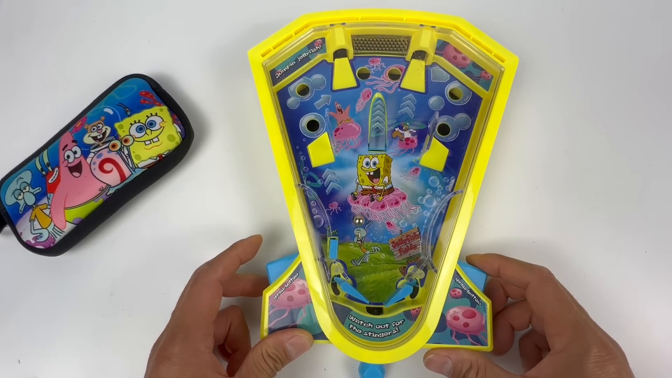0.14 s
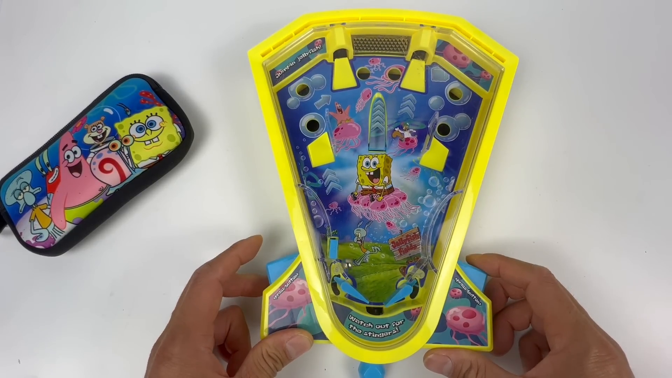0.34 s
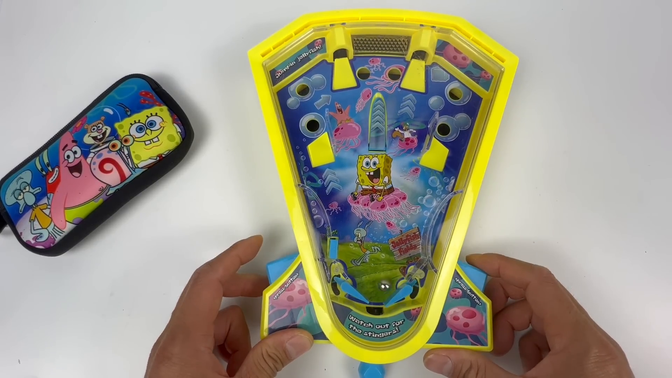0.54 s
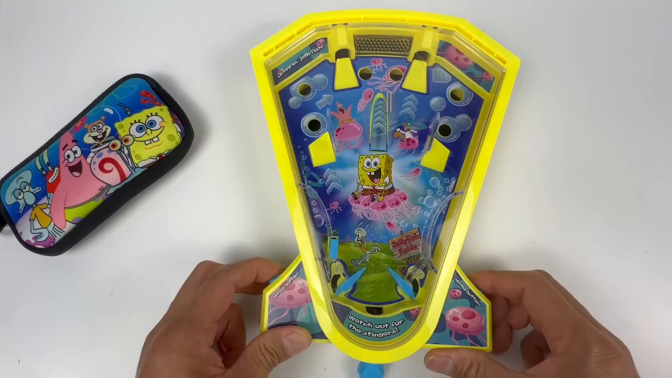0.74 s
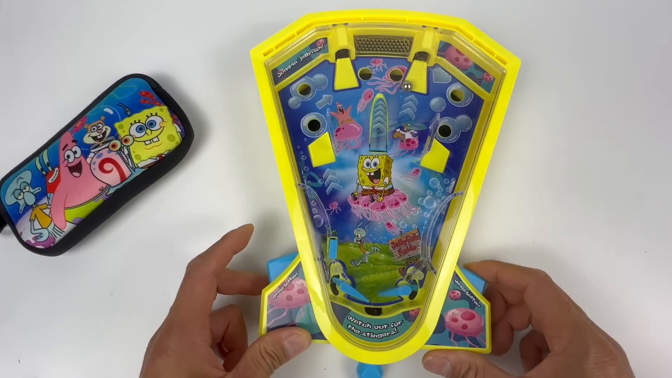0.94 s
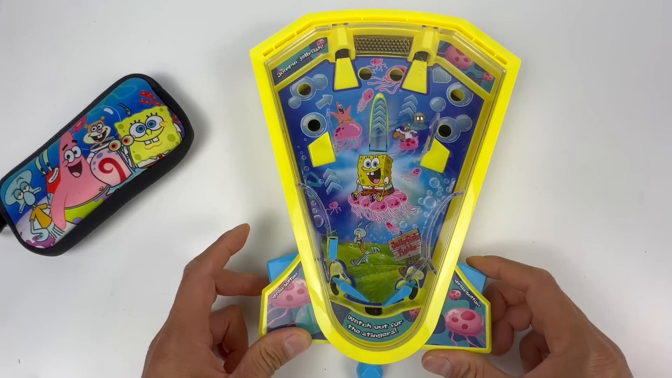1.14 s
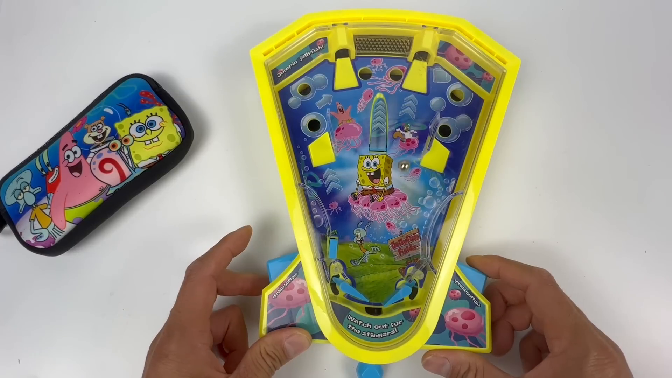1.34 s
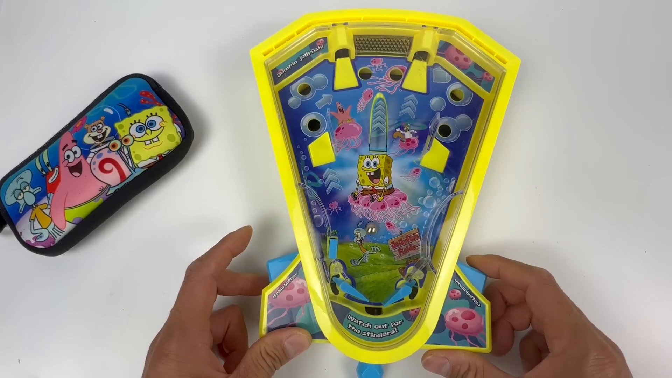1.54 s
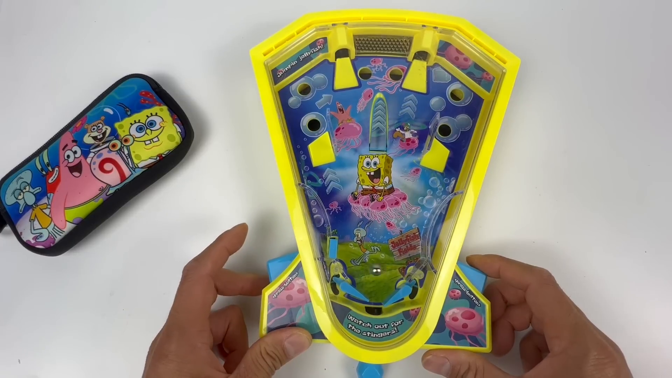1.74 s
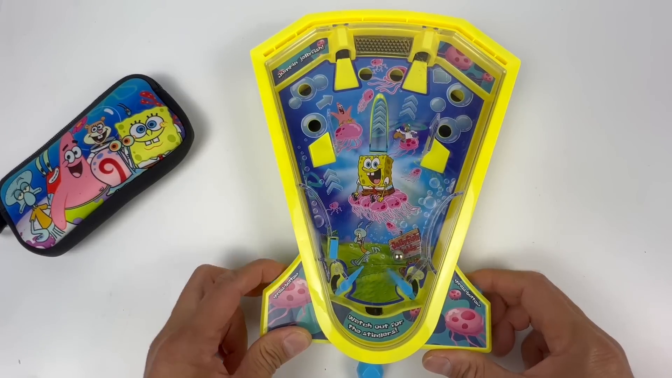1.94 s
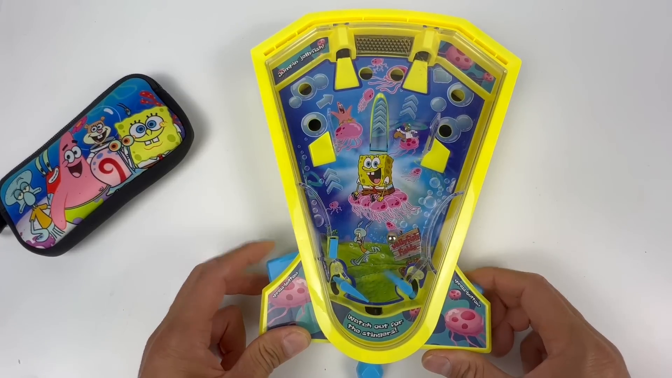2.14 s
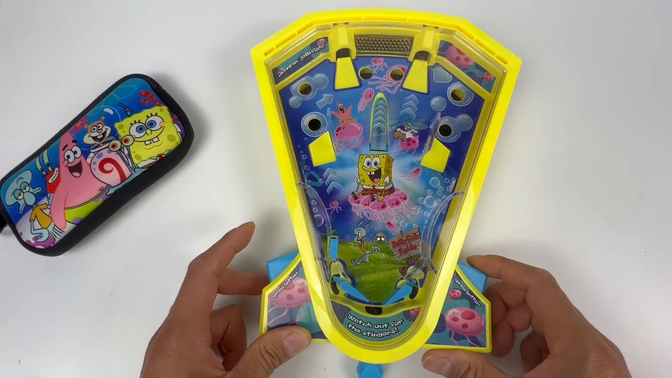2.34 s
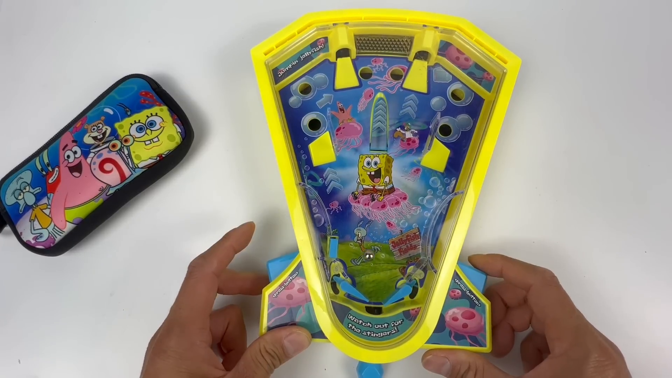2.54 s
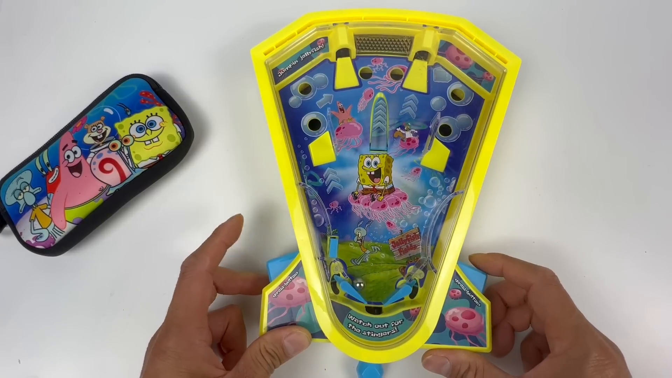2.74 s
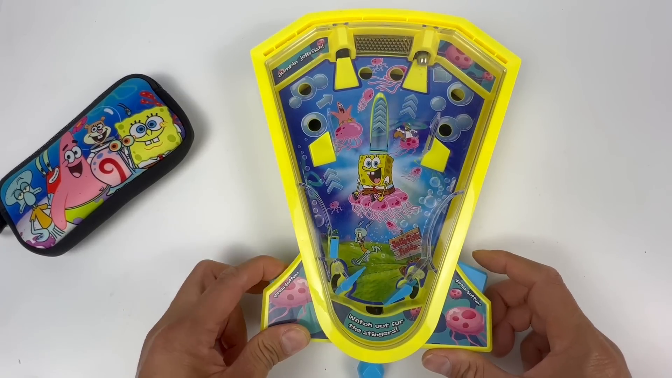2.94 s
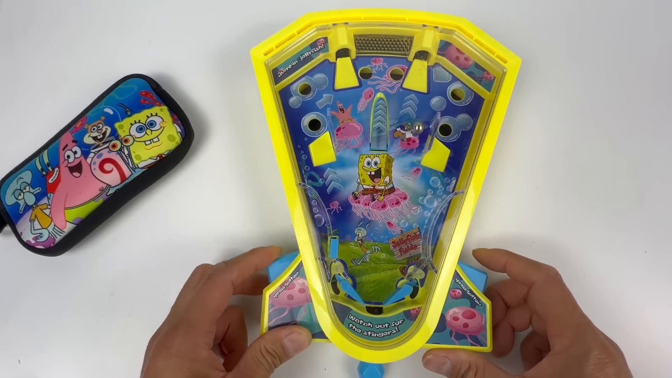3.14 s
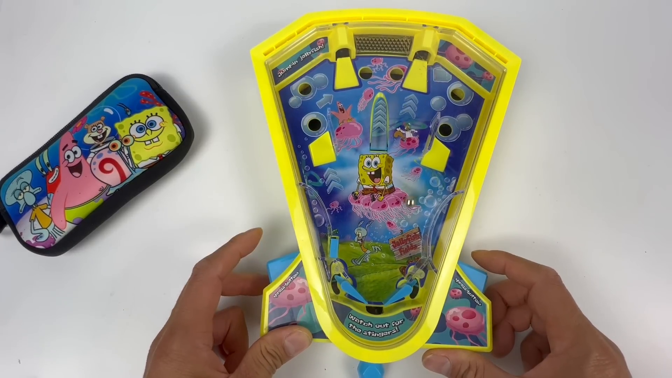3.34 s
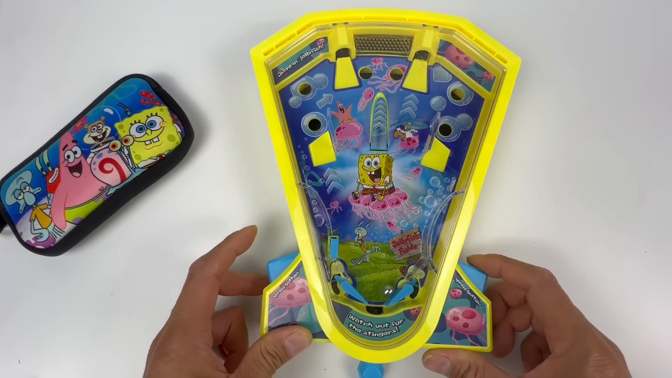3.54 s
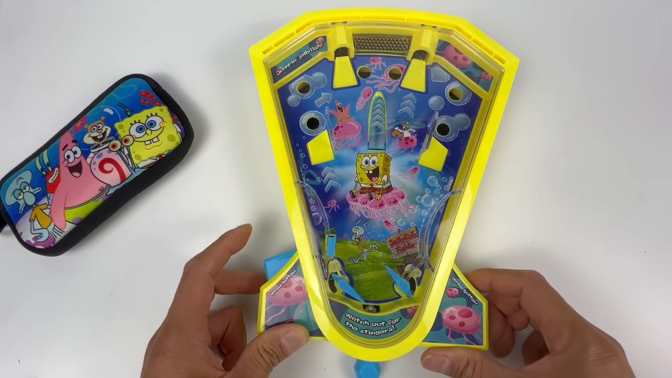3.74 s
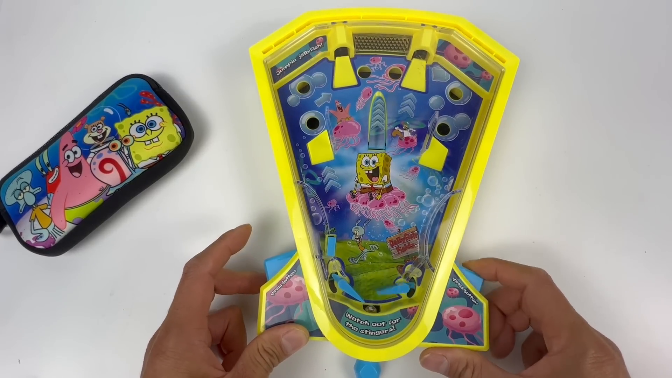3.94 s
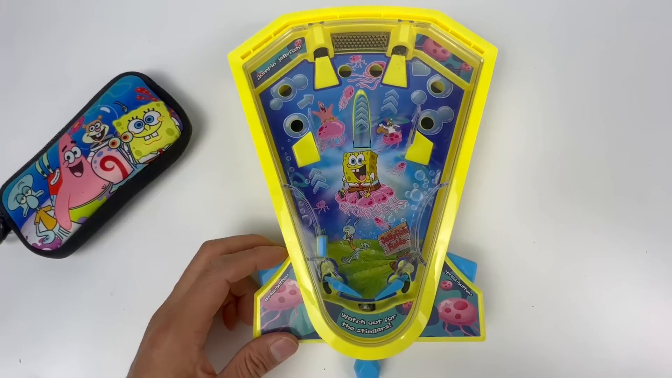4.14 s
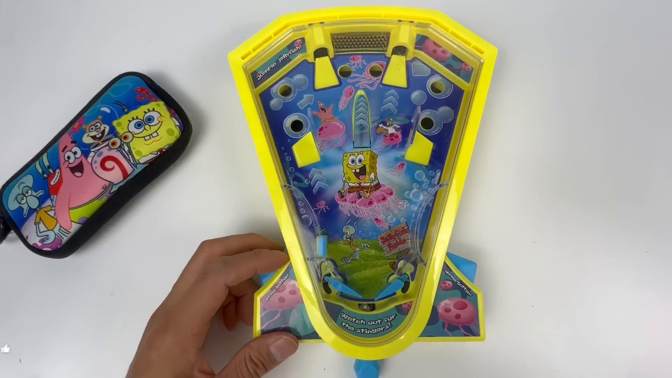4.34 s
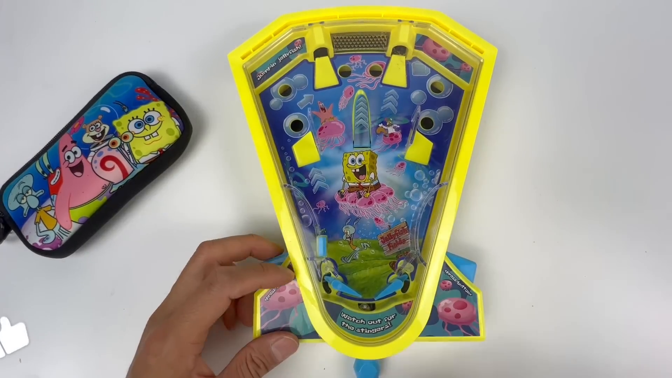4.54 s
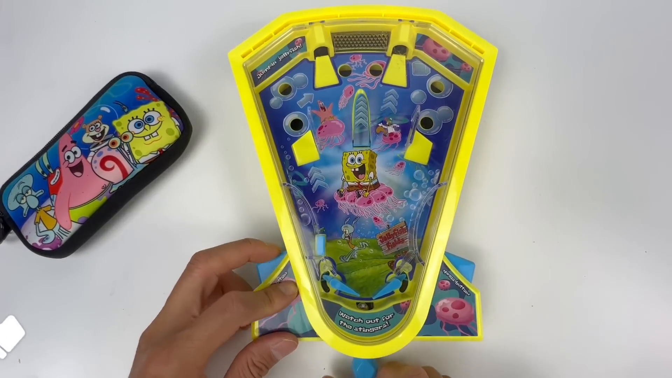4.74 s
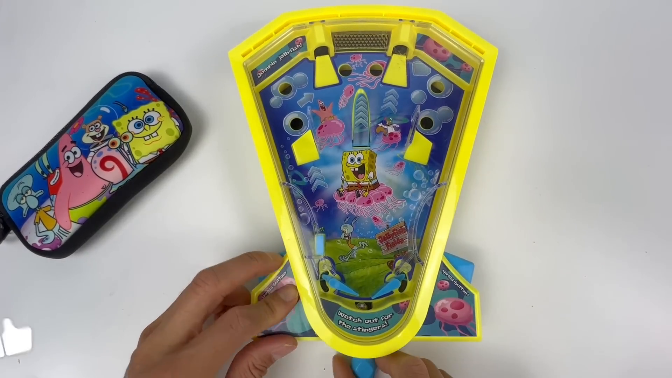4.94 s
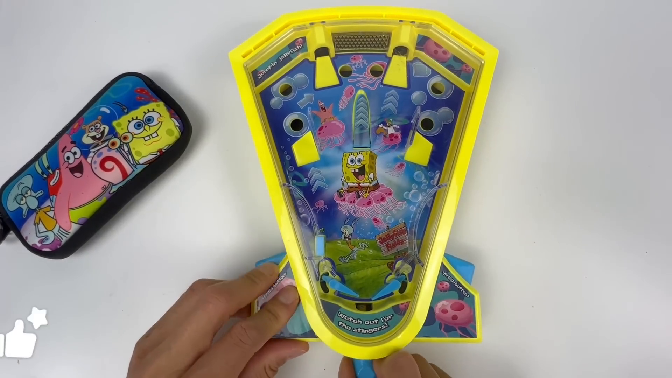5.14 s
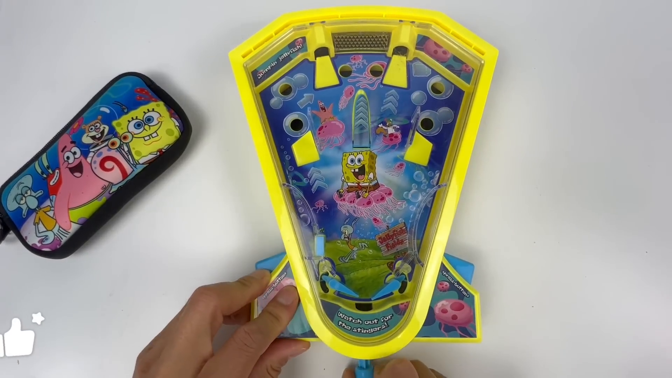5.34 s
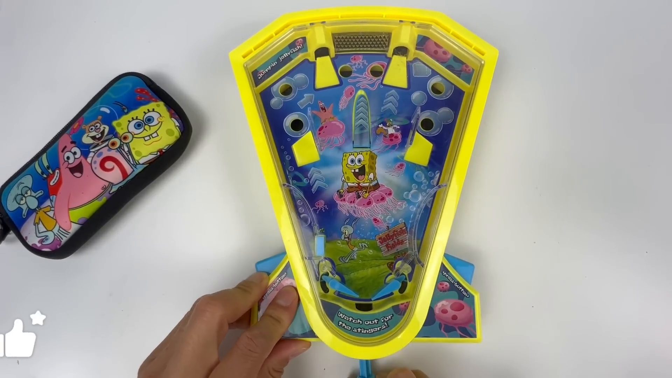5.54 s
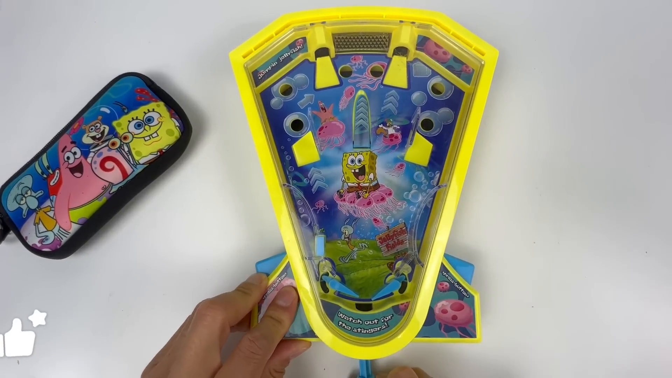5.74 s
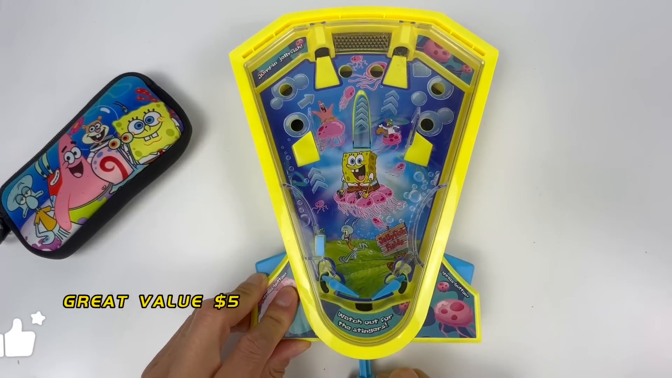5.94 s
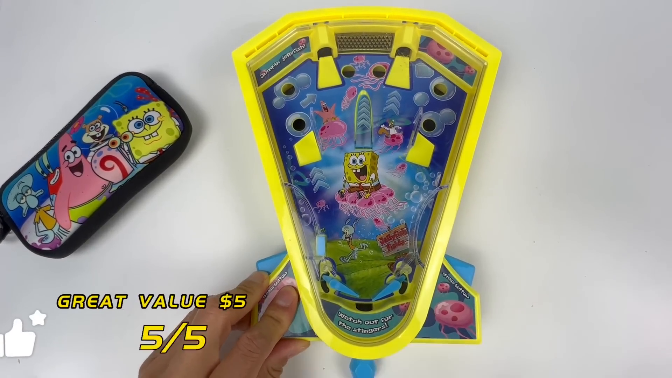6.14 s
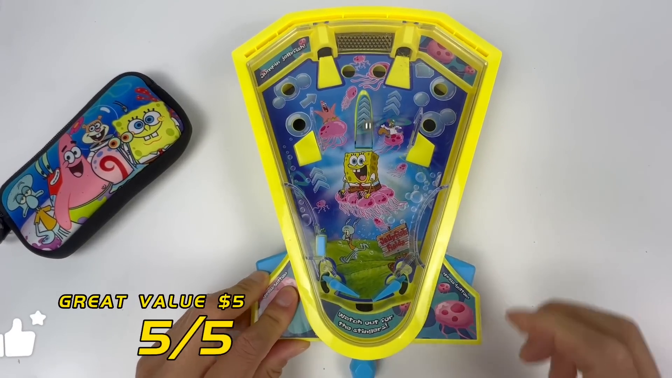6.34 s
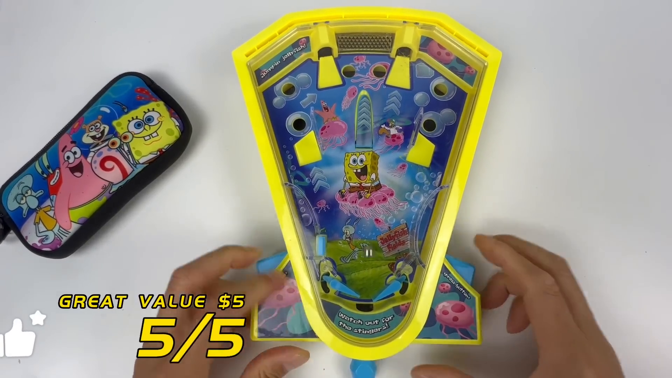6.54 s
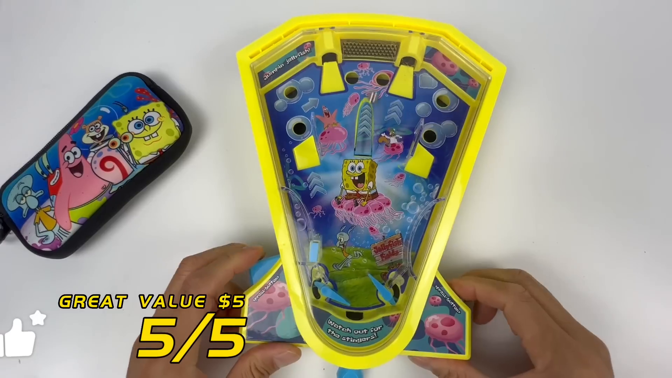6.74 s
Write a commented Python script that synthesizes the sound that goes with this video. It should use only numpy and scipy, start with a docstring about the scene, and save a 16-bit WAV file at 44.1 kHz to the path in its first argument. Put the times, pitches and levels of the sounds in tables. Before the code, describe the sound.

Plastic pinball toy played by hand: sharp lever clacks, soft ball rumble, dull bounces, then a quiet handling rustle and another rattling launch.

```python
"""First a small ball rumbles over a board in faint air noise; then a plastic pinball toy clacks in a bare room.
Flippers, plunger and a steel ball strike the hollow case: noise cracks plus dying sines for its modes.
Bounces ring the thin playfield; rolling, rubbing and finger grips are streams of tiny random contacts.
Loose parts chatter, the feet judder on the desk, and the room adds reflections.
Two stretches of play are joined by a hard splice, where the room's ring stops short."""
import sys
import numpy as np
from scipy import signal
from scipy.fft import rfft, irfft, next_fast_len
from scipy.io import wavfile

SR = 44100
rng = np.random.default_rng(int(sys.argv[2]) if len(sys.argv) > 2 else 0)


def wav_record(signal):
    """Record a signal, one row per channel, as 16-bit PCM in the file named by sys.argv[1]."""
    frames = np.transpose(np.atleast_2d(signal))
    bounded = np.clip(frames, -1, 1)
    # unit amplitude maps onto the largest positive 16-bit level
    quanta = np.round(bounded * 32767).astype(np.int16)
    wavfile.write(sys.argv[1], SR, quanta)


N = 299439
T = np.arange(N) / SR
HIT_T = T[:SR // 5]  # time axis of one blow, 0.2 s
LEFT_RIGHT = np.array([[1], [-1]])  # opposite signs for the two channels


def from_db(db):
    """Turn decibels into a gain."""
    return 10 ** (np.asarray(db) / 20)


def rms_one(x):
    """Scale a sound to rms 1."""
    return x / np.sqrt(np.mean(x ** 2) + 1e-20)


def attack_one(x, size=SR // 125):
    """Scale a blow to rms 1 over its first samples, 8 ms unless told otherwise."""
    return x / np.sqrt(np.mean(x[..., :size] ** 2) + 1e-20)


def at_hz(points, hz):
    """Read a table between its points, on a log-frequency axis."""
    f, value = np.transpose(points)
    return np.interp(np.log(hz), np.log(f), value)


def fft_hz(n):
    """Frequencies of a real FFT of n samples, with 1 Hz in place of zero."""
    return np.maximum(np.arange(n // 2 + 1) * SR / n, 1)


def add(out, s, sound):
    """Mix a sound in at time s."""
    i = int(s * SR)
    out[:, i:i + sound.shape[-1]] += sound[..., :N - i]


def gain_curve(rows, attack_s, release_s, slope_db_per_s):
    """Gain of strokes that swell, hold on a slope and fade; attack and release each span 20 dB."""
    out = np.zeros(N)
    for start, length, db in rows:
        held = np.clip(T, start, start + length)
        outside = np.maximum(held - T, 0) / attack_s + np.maximum(T - held, 0) / release_s
        slope_db = slope_db_per_s * (held - start - length / 2)
        stroke = from_db(db + slope_db - 20 * np.minimum(outside, 10))
        out = np.maximum(out, stroke)
    return out


def colour(x, spectrum):
    """Filter a sound by a table of levels over frequency, then scale it to rms 1."""
    n = next_fast_len(x.shape[-1])
    gain = from_db(at_hz(spectrum, fft_hz(n)))
    return rms_one(irfft(rfft(x, n) * gain, n)[..., :x.shape[-1]])


def band(x, low_hz, high_hz):
    """Keep one frequency band with a causal filter."""
    edges = [low_hz, min(high_hz, SR / 2 - 100)]
    return signal.sosfilt(signal.butter(2, edges, "band", fs=SR, output="sos"), x)


def waver(per_s, depth_db):
    """A gain that wanders at random between knots."""
    knots = rng.standard_normal(1000)
    return from_db(depth_db * np.interp(T * per_s, np.arange(len(knots)), knots))


def grains(per_s, spread_db):
    """Tiny contacts at random moments, of random sign and size."""
    sizes = from_db(spread_db * np.minimum(rng.exponential(1, N), 4)) * rng.choice([-1, 1], N)
    return sizes * (rng.random(N) < per_s / SR)


def note(hz, t60):
    """One dying sine, rms 1 in its attack."""
    return attack_one(from_db(-60 * HIT_T / t60) * np.sin(2 * np.pi * hz * HIT_T))


MODE_DETUNING = .02  # random spread of mode pitch from blow to blow, as a share of pitch


def ring(modes, t60_at_1k, scatter_db):
    """Struck modes, each with a random strength and sign from blow to blow; high ones die sooner."""
    hz, db = np.transpose(modes)[:, :, None]
    hz = hz * (1 + MODE_DETUNING * rng.standard_normal(hz.shape))
    t60 = t60_at_1k * (1000 / hz) ** (1 / 3)
    strength = from_db(db + scatter_db * rng.standard_normal(hz.shape))
    strength = strength * rng.choice([-1, 1], hz.shape)
    return np.sum(strength * from_db(-60 * HIT_T / t60) * np.sin(2 * np.pi * hz * HIT_T), axis=0)


def scraping(slips, spectrum, width=0.6, count=6):
    """Each slip is a tiny 22 ms noise blow on one of several spots of the case; rms 1."""
    out = 0
    spots = rng.integers(0, count, N)
    for k in range(count):
        mid, side = rng.standard_normal((2, len(HIT_T))) * from_db(-60 * HIT_T / .022)
        blow = mid + width * band(side, 600, 8000) * LEFT_RIGHT
        here = (slips * (spots == k))[None]
        out = out + signal.oaconvolve(here, blow, axes=1)[:, :N]
    return colour(out, spectrum)


# How alike spread-out sound is at left and right: f/Hz, likeness (1 = the same)
LIKENESS = [(60, .99), (290, .88), (640, .55), (1400, .38), (3100, .22), (7000, .3), (14000, .8)]


def diffuse(n):
    """White stereo noise whose two sides are more or less alike at each frequency."""
    mid, side = rfft(rng.standard_normal((2, n)))
    alike = np.clip(at_hz(LIKENESS, fft_hz(n)), -1, 1)
    return irfft(np.sqrt(1 + alike) * mid + np.sqrt(1 - alike) * side * LEFT_RIGHT, n)


# Tone of the faint air noise, before scaling to rms 1: f/Hz, relative level/dB
AIR_SPECTRUM = [(12, -37.5), (22, -23), (38, -12), (58, -4.5), (91, -19.5), (130, -9.5), (377, -43.5),
                (4300, -57), (12100, -64.5), (16000, -74)]


def air(level_db=-57.5):
    """Steady, mostly low noise in the air: random noise given a fixed tone."""
    return from_db(level_db) * colour(diffuse(next_fast_len(N))[:, :N], AIR_SPECTRUM)


# Late sound of the room: f/Hz, level/dB
ROOM_LEVEL = [(60, -21.5), (200, -17.5), (400, -19), (1000, -19.5), (2500, -23.5), (4500, -18),
              (6200, -18.5), (10000, -22.5), (11700, -19), (12800, -32.5), (15000, -36)]
# How long the late sound takes to fall by 60 dB: f/Hz, t60/s
ROOM_T60 = [(60, 3.9), (400, 0.29), (1200, 0.68), (3000, 0.99), (7000, 0.74), (15000, 0.32)]


def room(x, early_db=-17, early_t60=0.073, build_s=0.014):
    """Quick reflections from desk and walls, then a long faint tail that dies band by band."""
    t, response = T[:SR * 3 // 2], 0
    edges = np.geomspace(40, 18000, 13)
    noises = diffuse(len(t)), diffuse(len(t))
    onset = 1 - np.exp(-(t / build_s) ** 2)
    early = from_db(early_db) * rms_one(onset * from_db(-60 * t / early_t60))
    for k, (low, high) in enumerate(zip(edges, edges[1:])):
        hz = np.sqrt(low * high)
        tail = rms_one(onset * from_db(-60 * t / at_hz(ROOM_T60, hz)))
        late = from_db(at_hz(ROOM_LEVEL, hz)) * tail
        # neighbouring bands take turns between two noises
        response = response + band(noises[k % 2], low, high) * np.hypot(late, early) / np.sqrt(len(t))
    return signal.fftconvolve(x, response, axes=1)[:, :N]


# The toy's feet judder on the desk: start t/s, length t/s, level/dB
SHIFTS = [(1.925, 0.037, -39.5), (2.79, 0.011, -30.5), (5.42, 0.2, -50), (6.12, 0.065, -37.5),
          (6.58, 0.16, -43)]


def shifting():
    """Pushed or jolted, the toy judders on the desk: a low rumble of many tiny contacts."""
    judder = rms_one(band(grains(per_s=1600, spread_db=2.0), 95, 175.7))
    return gain_curve(SHIFTS, attack_s=0.014, release_s=.09, slope_db_per_s=0) * judder


# Fingers slide over the case and shift it: start t/s, length t/s, level halfway/dB before level_db
GRIPS = [(4.46, 0.15, -66.5), (4.725, 0.049, -52.5), (4.835, 0.038, -52.5), (4.92, 0.036, -51.5),
         (5.03, 0.12, -54), (5.22, 0.26, -42.5), (5.41, 0.093, -44.5)]
# Tone of skin on the hollow case, before scaling to rms 1: f/Hz, relative level/dB per Hz
SKIN_SPECTRUM = [(60, -11.5), (135, 9), (230, 0.5), (420, 10), (620, -2.5), (900, 1), (1500, -12),
                 (2500, -13.5), (4500, -34), (6300, -28), (11000, -40), (15500, -54)]


def handling(level_db=-2):
    """Fingers drag over the case in sparser, duller slips than the plastic parts make."""
    slips = grains(per_s=700, spread_db=3) * waver(per_s=40, depth_db=2.5)
    strokes = gain_curve(GRIPS, attack_s=0.049, release_s=0.1, slope_db_per_s=6)
    return from_db(level_db) * strokes * scraping(slips, SKIN_SPECTRUM)


# Light touches of fingers and loose buttons: t/s, level/dB, hardness/dB (tick against body)
TAPS = [(2.194, -39.5, -2), (3.807, -41, -5.5), (3.974, -39, -7), (4.708, -56.5, -9), (4.822, -52, -7),
        (4.846, -47.5, -13), (4.896, -55, -13), (4.96, -59, -11), (5.105, -48.5, -15), (5.281, -36.5, -5),
        (5.465, -43.5, 0.5), (6.364, -40.5, 12)]
# Ringing modes of the hollow case, also used for hard blows: f/Hz, relative level/dB
CASE_MODES = [(130, -5.5), (185, 3), (255, -5), (378, 1), (450, 0.5), (564, -4), (802, 1.5), (900, 4),
              (1184, -1), (1449, 2.5), (1756, -9.5), (1950, 0), (2212, -1.5), (2550, 0), (2788, -8.5),
              (3266, -4.5), (3874, -16.5), (5950, -12.5), (6350, -10.5)]
# Crowded short modes of the plastic, for taps, chatter and knocks: f/Hz, relative level/dB per Hz
CRACK_SPECTRUM = [(70, 6.5), (200, -5), (400, 1), (900, 2), (1900, 2), (2700, 1.5), (3500, -6), (5000, -15),
                  (6200, -13.5), (8000, -15), (10000, -21.5), (12500, -15), (15500, -25.5)]


def taps(t60=0.012, case_t60=.04, top_hz=5000):
    """Fingertips knock dully on the case; nails and loose buttons tick, brighter when harder."""
    out = np.zeros((2, N))
    for s, db, hardness_db in TAPS:
        crack = colour(rng.standard_normal(len(HIT_T)), CRACK_SPECTRUM) * from_db(-60 * HIT_T / t60)
        tick = attack_one(band(crack, 400, max(top_hz * from_db(hardness_db), 1000)))
        body = attack_one(band(ring(CASE_MODES, case_t60, scatter_db=2.5), 400, 1200))
        add(out, s, from_db(db) * attack_one(body + from_db(hardness_db) * tick))
    return out


# Buttons, plunger and ball slide on plastic: start t/s, length t/s, level halfway/dB before level_db
RUBS = [(1.55, 0.025, -57), (2.105, 0.1, -36.5), (3.095, 0.036, -41), (3.53, 0.094, -44.5),
        (3.64, 0.033, -35.5), (3.9, 0.064, -39.5), (6.122, 0.035, -21.5), (6.628, 0.024, -22.5),
        (6.69, 0.091, -38)]
# Tone of plastic sliding on plastic, before scaling to rms 1: f/Hz, relative level/dB
RUB_SPECTRUM = [(100, -9.5), (250, -6), (420, 1), (900, 2), (1600, -7), (2400, -9), (4500, -20.5),
                (6300, -23), (11000, -30), (15500, -27)]


def rubbing(level_db=-2):
    """Sliding plastic sticks and slips under uneven pressure."""
    slips = grains(per_s=1200, spread_db=3) * waver(per_s=60, depth_db=2)
    strokes = gain_curve(RUBS, attack_s=.025, release_s=0.032, slope_db_per_s=-3.5)
    return from_db(level_db) * strokes * scraping(slips, RUB_SPECTRUM)


# Runs of the ball down the slope: start t/s, length t/s, level halfway/dB before level_db and wavering
ROLLS = [(0.06, 0.12, -59.5), (0.46, 0.11, -46.5), (1.19, .14, -51.5), (1.42, 0.05, -53.5),
         (1.54, 0.034, -40.5), (1.72, 0.062, -43.5), (2.44, 0.13, -59), (3.18, 0.22, -58),
         (3.38, 0.19, -52.5), (6.466, 0.033, -37), (6.575, 0.019, -33)]
# The ball crosses the middle of the board: start t/s, length t/s, level halfway/dB before drum_db
DRUMS = [(0.05, 0.09, -42), (0.95, 0.63, -41), (3.03, 0.3, -42.5), (6.3, 0.18, -36.5)]
# Tone of the rolling rumble, before scaling to rms 1: f/Hz, relative level/dB
ROLL_SPECTRUM = [(100, -17.5), (250, -1), (400, 13.5), (600, 7), (950, 7.5), (1200, -14.5), (2000, -27.5),
                 (3000, -36), (6000, -55.5), (15000, -62)]
# Tone of fine grit under the ball, before scaling to rms 1: f/Hz, relative level/dB per Hz
GRIT_SPECTRUM = [(400, -26), (1000, 1), (2200, -1.5), (3200, -24.5), (7000, -30.5), (15000, -44.5)]
# Ringing modes of the thin playfield, also used for bounces: f/Hz, relative level/dB
BOARD_MODES = [(275, -1), (310, -8), (380, 0.5), (440, -7.5), (560, -7.5), (630, 0), (805, -3), (905, -3.5),
               (1150, -7.5)]


def drumming(drum_hz=315, width_hz=60):
    """The board's lowest mode drums and wanders in pitch: slow noise carried on a tone; rms 1."""
    mode_hz = drum_hz * waver(per_s=14, depth_db=.85)
    low_pass = signal.butter(2, width_hz / 2, fs=SR, output="sos")
    swing = signal.sosfilt(low_pass, rng.standard_normal((2, N)))
    phase = 2 * np.pi * np.cumsum(mode_hz) / SR
    return rms_one(swing[0] * np.cos(phase) + swing[1] * np.sin(phase))


def rolling(level_db=-1, board_db=-4, grit_db=-19, drum_db=-2, drum_rumble_db=-12.5):
    """Bumps and grit under the ball shake the board, which drums as its weight crosses the middle."""
    bumps = grains(per_s=1500, spread_db=2.0)
    board_ring = ring(BOARD_MODES[2:], t60_at_1k=0.084, scatter_db=0.5)  # without its two lowest modes
    board = rms_one(signal.fftconvolve(bumps, board_ring)[:N])
    rumble = colour(grains(per_s=900, spread_db=0.0), ROLL_SPECTRUM)
    rumble = rms_one(rumble + from_db(board_db) * band(board, 200, 1200))
    grit = colour(grains(per_s=900, spread_db=3), GRIT_SPECTRUM)
    # the ball gets louder along each run as it speeds up
    speed = gain_curve(ROLLS, attack_s=0.015, release_s=.08, slope_db_per_s=16.5)
    speed = speed * waver(per_s=45, depth_db=2.5)
    near_middle = gain_curve(DRUMS, attack_s=.07, release_s=0.045, slope_db_per_s=-1.5)
    runs = from_db(level_db) * speed * (rumble + from_db(grit_db) * grit)
    drum = drumming() + from_db(drum_rumble_db) * rumble
    return runs + from_db(drum_db) * near_middle * drum


# Ball landings: t/s, pitch of the struck spot f/Hz, level/dB,
# flight to next landing t/s (0 = no further hops are worked out from this row)
BOUNCES = [(0.708, 926, -27.5, 0), (0.8008, 760, -22.5, 0), (0.8733, 794, -20.5, .045),
           (1.218, 466, -26.5, 0), (2.803, 450, -22.5, 0), (2.833, 450, -25.5, 0),
           (2.9952, 804, -28.5, .029), (3.655, 686, -23, 0), (3.688, 946, -30, 0), (5.1847, 444, -35.5, 0),
           (5.5208, 884, -44.5, 0), (6.1506, 460, -22.5, 0), (6.2649, 870, -19.5, 0),
           (6.3133, 614, -26, .034), (6.408, 910, -29.5, 0), (6.6978, 665, -29.5, 0)]
# each flight is this share of the last and lands softer; after a very short one the hops stop
RESTITUTION, BOUNCE_LOSS_DB, SHORTEST_FLIGHT_S = .73, 4, .022
BOUNCE_DULLING = 0.54  # a softer landing is duller: share of the pitch kept at each bounce


def landings():
    """Rows with a flight hop on in ever shorter, softer bounces: (t/s, pitch f/Hz, level/dB)."""
    rows = []
    for s, spot_hz, db, flight_s in BOUNCES:
        rows.append((s, spot_hz, db))
        while flight_s > SHORTEST_FLIGHT_S and db > -60:
            s = s + flight_s
            db = db - BOUNCE_LOSS_DB
            flight_s = flight_s * RESTITUTION
            spot_hz = spot_hz * BOUNCE_DULLING
            rows.append((s, spot_hz, db))
    return rows


def bounces(board_t60=.036, spot_db=-5, spot_t60=0.039, repeat_s=0.0034, repeat_db=-5, soft_above_hz=450):
    """Each landing is a dull knock of the thin board with a close, softer repeat, like a desk reflection."""
    out = np.zeros((2, N))
    for s, spot_hz, db in landings():
        for delay, loss_db in [(0, 0), (repeat_s, repeat_db)]:
            board = attack_one(ring(BOARD_MODES, board_t60, scatter_db=2.5))
            knock = board + from_db(spot_db) * note(spot_hz, spot_t60)
            dull_knock = attack_one(band(knock, 140, spot_hz + soft_above_hz))
            add(out, s + delay, from_db(db + loss_db) * dull_knock)
    return out


# Edges of the four parts of a hard blow (thump, body, clack, tick): f/Hz
REGISTERS_HZ = [50, 300, 1200, 4500, 15500]
CONTACT_S = .0004  # time in which a contact builds up
SNAP_DB, SNAP_T60 = 6, .008  # the first snap stands above the ring; t60 in s
CRACK_WIDTH = .45  # share of the crack that differs between left and right
HARD_SHORTENING = 0.0096  # growth of the main ring's decay rate per dB of hardness


def blows(rows, tone_db, spectrum, bass_t60, treble_t60, after_db, after_t60,
          modes_db, modes_t60, spot_db, spot_t60):
    """Hard contacts: a crack of crowded modes, the case's own modes and the note of the struck spot."""
    out = np.zeros((2, N))
    filters = [signal.butter(3, edges, "band", fs=SR, output="sos")
               for edges in zip(REGISTERS_HZ, REGISTERS_HZ[1:])]
    # levels are set over the first 25 ms of the thump and 8 ms of the rest
    attacks = [SR // 40, SR // 125, SR // 125, SR // 125]
    t60s = np.geomspace(bass_t60, treble_t60, len(filters))  # the highs die first
    snap = from_db(SNAP_DB - 60 * HIT_T / SNAP_T60)
    after = from_db(after_db - 60 * HIT_T / after_t60)  # loose parts buzz on after the blow
    build = 1 - np.exp(-HIT_T / CONTACT_S)
    for s, spot_hz, level_db, hardness_db in rows:
        # a harder contact gives less body and more tick
        levels_db = level_db + np.array(tone_db) + hardness_db * np.array([0, -1, 0, 1])
        mid, side = colour(rng.standard_normal((2, len(HIT_T))), spectrum)
        crack = mid + CRACK_WIDTH * band(side, 1200, 5300) * LEFT_RIGHT
        case = from_db(modes_db) * attack_one(ring(CASE_MODES, modes_t60, scatter_db=4))
        tone = case + from_db(spot_db) * note(spot_hz, spot_t60)
        for sos, attack, db, t60 in zip(filters, attacks, levels_db, t60s):
            body = from_db(-60 * HIT_T / t60 * np.exp(HARD_SHORTENING * hardness_db))
            fall = (snap + body + after) * build
            part = signal.sosfilt(sos, crack * attack_one(fall) + tone)
            add(out, s, from_db(db) * attack_one(part, size=attack))
    return out


# Ball against pegs and walls: t/s, pitch of the struck spot f/Hz, level/dB before the tone, hardness/dB
PINGS = [(0.344, 843, -34.5, 1.5), (1.6535, 882, -37.5, 1), (1.843, 1476, -38.5, 0)]
# Tone added to each ping's level: thump level/dB, body level/dB, clack level/dB, tick level/dB
PING_TONE_DB = (-8.5, 2, -1.5, -4)
# Crowded short modes of a ping: f/Hz, relative level/dB per Hz
PING_SPECTRUM = [(70, -7.5), (160, -3), (330, -8), (900, 4), (1400, -4), (2600, -7.5), (3600, -9),
                 (5300, -18), (6700, -3), (9000, -15), (12000, -13.5), (15500, -20.5)]
# Ringing modes of a struck peg: f/Hz, relative level/dB
PEG_MODES = [(155, 3), (880, -2.5), (1340, -5.5), (6600, -7), (6950, -11.5)]


def pings(peg_db=-16.5, peg_t60=0.25):
    """The steel ball glances off pegs, with a bright edge, and leaves them ringing."""
    out = blows(PINGS, PING_TONE_DB, PING_SPECTRUM, bass_t60=0.097, treble_t60=0.072,
                after_db=-30.5, after_t60=.17, modes_db=1.5, modes_t60=0.09, spot_db=-5.0, spot_t60=0.044)
    for s, spot_hz, db, hardness_db in PINGS:
        peg = attack_one(ring(PEG_MODES, peg_t60, scatter_db=-2.0))
        add(out, s, from_db(db + peg_db) * peg)
    return out


# The heaviest blows ring the broad back of the case: t/s, level/dB
THUNKS = [(0.773, -22.5), (2.784, -22.5), (5.151, -25.5)]
# Ringing modes of that back: f/Hz, relative level/dB
BACK_MODES = [(372, 1), (455, 0.27), (680, -2), (930, -0.64)]


def thunks(t60=0.071):
    """A heavy blow of plunger, flipper or ball draws a hollow thunk: dying sines of the case's back."""
    out = np.zeros((2, N))
    for s, db in THUNKS:
        add(out, s, from_db(db) * attack_one(ring(BACK_MODES, t60, scatter_db=0.5)))
    return out


CASE_T60, SPOT_T60 = .06, .03  # ring of the case at 1 kHz and of the struck spot, damped by the hands, in s


def knocks(rows, tone_db, desk_db=-11, desk_hz=53, desk_t60=0.11, ahead_s=.009, ahead_db=-24):
    """The blow lands on the case, with a faint copy 9 ms ahead; its thump sets the desk booming."""
    out = blows(rows, tone_db, CRACK_SPECTRUM, bass_t60=0.074, treble_t60=0.037,
                after_db=-38.0, after_t60=0.53, modes_db=-1.0, modes_t60=CASE_T60,
                spot_db=-3.5, spot_t60=SPOT_T60)
    out = out + from_db(ahead_db) * np.roll(out, -int(ahead_s * SR), axis=1)
    for s, spot_hz, db, hardness_db in rows:
        boom = band(note(desk_hz, desk_t60), 38, 120)
        add(out, s, from_db(db + tone_db[0] + desk_db) * boom)
    return out


# Sharp knocks of ball, buttons and plunger on the case, which also start the chatter:
# t/s, pitch of the struck spot f/Hz, level/dB before the tone, hardness/dB (less body, more tick)
CLACKS = [(0.57, 860, -43, -5.5), (0.673, 930, -23, 4.5), (0.6858, 2614, -15.5, 0.5),
          (0.7611, 1490, -20, 10.5), (0.7721, 1457, -19.5, -6.5), (0.8242, 840, -31, -1.5),
          (0.8378, 1200, -33, -2), (1.215, 614, -37, 1), (1.9169, 806, -24, -2), (1.9411, 1406, -16.5, 1.5),
          (2.1195, 860, -29.5, -2.5), (2.127, 1576, -23, -0.5), (2.7241, 833, -45.5, -5),
          (2.9195, 1820, -15.5, -2.5), (3.098, 1380, -40.5, 1.5), (3.131, 2600, -44.5, -4),
          (3.1541, 2720, -35, -1), (3.521, 636, -37.5, -1), (3.541, 1210, -46, -13),
          (3.587, 1400, -53.5, -17), (3.6037, 2420, -29, 1.5), (3.613, 2584, -16.5, 2),
          (4.8763, 2520, -55, 1.5), (5.0662, 2630, -57, 10.5), (5.135, 930, -38, -10.5),
          (5.1489, 860, -21.5, 0), (5.153, 520, -25, -8.5), (6.122, 1225, -24.5, -3.5),
          (6.1279, 1660, -22, 8), (6.135, 820, -19, -0.5), (6.1769, 1167, -19, -6.5),
          (6.1858, 940, -32, 13.5), (6.2072, 1535, -19, -1.5), (6.2233, 1920, -16.5, 2.5),
          (6.6524, 1746, -16, 2.5)]


def chatter(level_db=-28, t60=.5, ticks_per_s=100):
    """Every clack shakes the loose lid and levers, which tick on ever more faintly."""
    jolts = np.zeros(N)
    for s, spot_hz, db, hardness_db in CLACKS:
        jolts[int(s * SR)] += from_db(db) ** 2
    # the shaking energy adds up and leaks away; its root is the gain
    energy = signal.lfilter([1], [1, -from_db(-120 / (t60 * SR))], jolts)
    ticks = scraping(grains(ticks_per_s, spread_db=-2.5), CRACK_SPECTRUM)
    return from_db(level_db) * np.sqrt(energy) * ticks


# Dull, heavy knocks that shake the whole toy: t/s, pitch of the struck spot f/Hz, level/dB before the tone
THUDS = [(0.6204, 578.4, -24), (2.8934, 586, -21.5), (2.925, 717, -16.5), (2.9817, 804, -22),
         (3.625, 1100, -35.5), (6.6677, 954, -22)]
# Tone added to each knock's level: thump level/dB, body level/dB, clack level/dB, tick level/dB
CLACK_TONE_DB = (-17.5, 0, 2, -7)
THUD_TONE_DB = (-12.5, 0, -10, -19)


def case_knocks():
    """Sharp clacks and dull thuds on the hollow case."""
    thuds = [(s, hz, db, 0) for s, hz, db in THUDS]
    return knocks(CLACKS, CLACK_TONE_DB) + knocks(thuds, THUD_TONE_DB)


# Flipper strokes: t/s, level at the stop/dB, level of the rebound/dB, both before the tone
FLIPS = [(0.6054, -17, -24), (1.9097, -17.5, -22.5), (2.7827, -17, -19), (6.6161, -25, -30)]
# Tone added to each flipper blow: thump level/dB, body level/dB, clack level/dB, tick level/dB
FLIP_TONE_DB = (-17, -1, -3, -4.5)


def flippers(spot_hz=860, rebound_s=.0177, rebound_hardness_db=3.5):
    """Each lever hits its stop and rebounds a moment later with a harder tick."""
    stops = [(s, spot_hz, db, 0) for s, db, rebound_db in FLIPS]
    rebounds = [(s + rebound_s, spot_hz, rebound_db, rebound_hardness_db) for s, db, rebound_db in FLIPS]
    return knocks(stops + rebounds, FLIP_TONE_DB)


SPLICE_S = 4.08  # time of the join


def scene():
    """Two stretches of play are spliced together, so the room's ring stops short at the join."""
    touches = shifting() + handling() + taps() + rubbing()
    ball = rolling() + bounces() + pings()
    case = thunks() + chatter() + case_knocks() + flippers()
    toy = touches + ball + case
    first = T < SPLICE_S
    reflected = room(toy * first) * first + room(toy * ~first)
    return air() + reflected + toy


# Phase between the two microphone ports: f/Hz, lead of the left one/radians
PORT_LEAD = [(60, 0), (700, 0), (1100, .3), (1800, -.05), (4000, -.2), (4900, -.9), (5700, -.1),
             (8300, -1.2), (9600, -.9), (11500, -2.3), (13000, -2.9)]


def record(dry):
    """The two ports hear the treble out of step; peaks are rounded and the top is cut."""
    n = next_fast_len(N + SR // 10)
    lead = at_hz(PORT_LEAD, fft_hz(n))
    heard = irfft(rfft(dry, n) * np.exp(.5j * lead * LEFT_RIGHT), n)[:, :N]
    top = 1.1  # level that rounded peaks cannot pass
    rounded = top * np.tanh(heard / top)
    top_cut = signal.cheby2(14, 70, 17000, fs=SR, output="sos")  # 70 dB down from 17 kHz
    return signal.sosfilt(top_cut, rounded)


dry = scene()
out = record(dry)
wav_record(out)
```